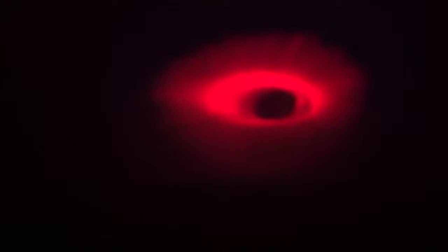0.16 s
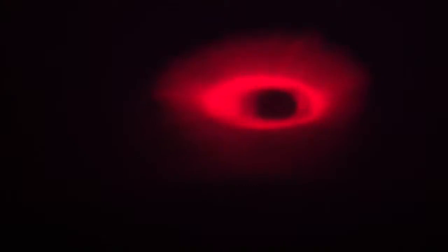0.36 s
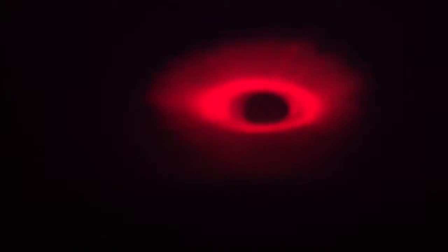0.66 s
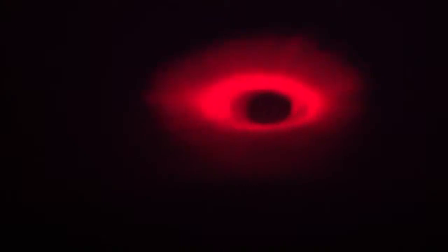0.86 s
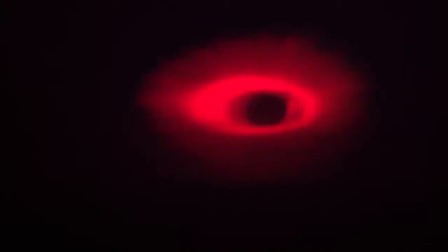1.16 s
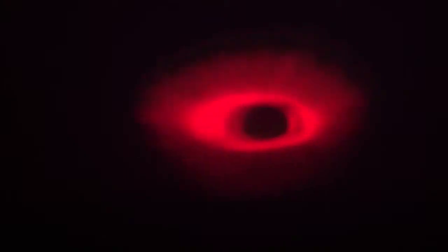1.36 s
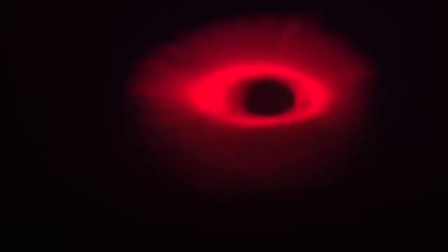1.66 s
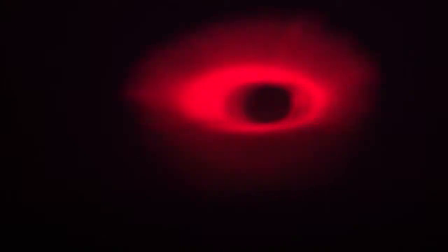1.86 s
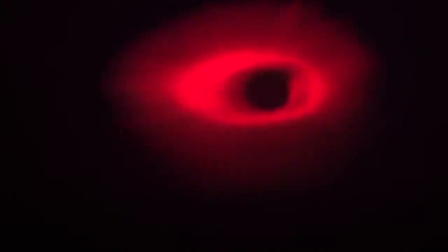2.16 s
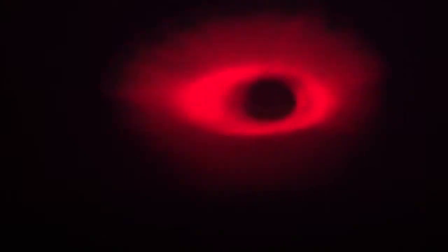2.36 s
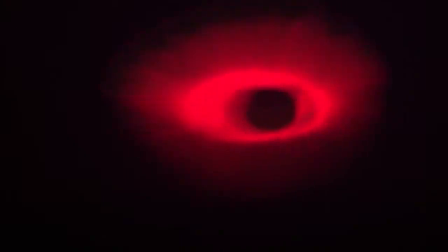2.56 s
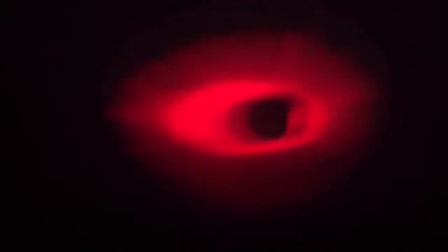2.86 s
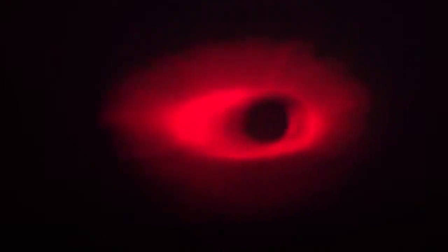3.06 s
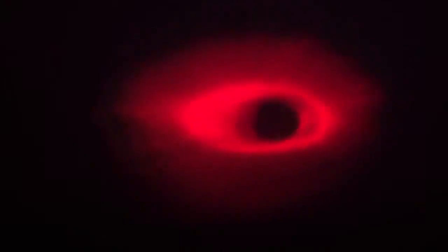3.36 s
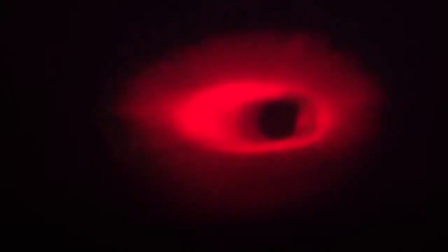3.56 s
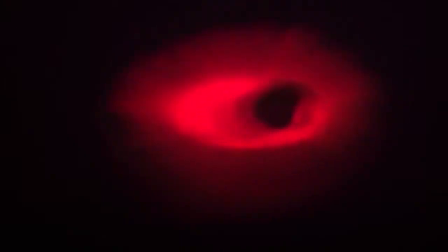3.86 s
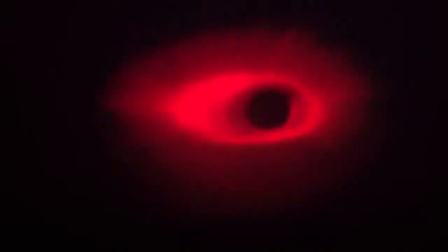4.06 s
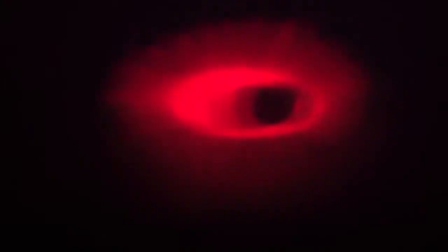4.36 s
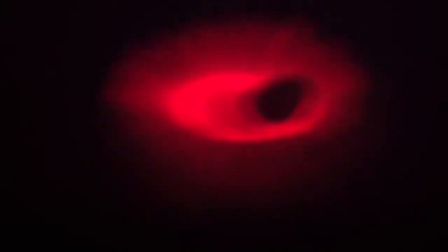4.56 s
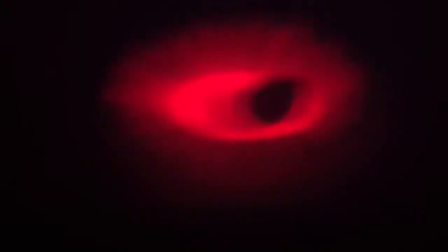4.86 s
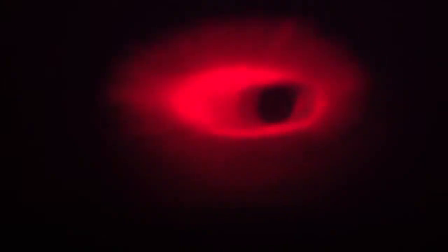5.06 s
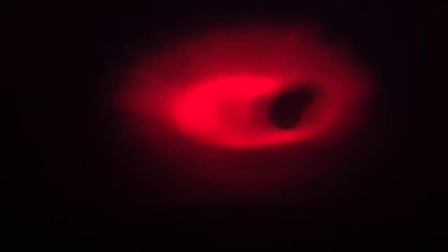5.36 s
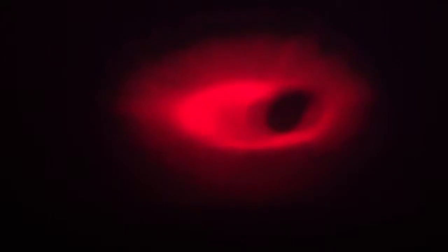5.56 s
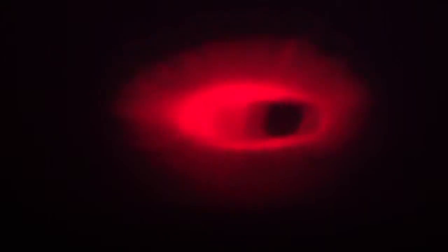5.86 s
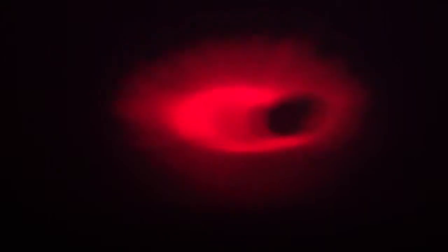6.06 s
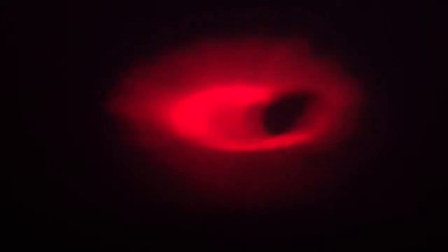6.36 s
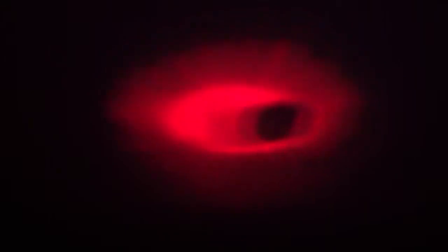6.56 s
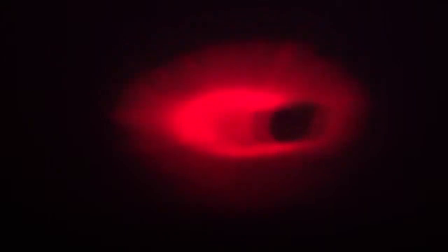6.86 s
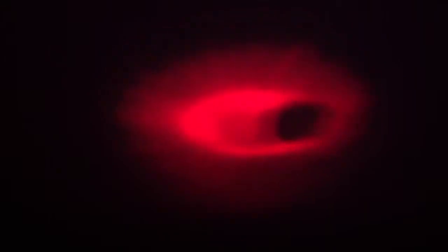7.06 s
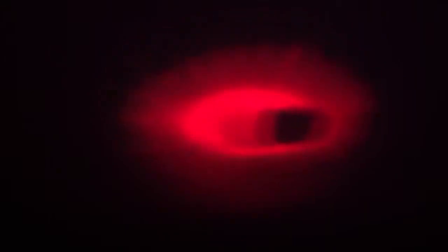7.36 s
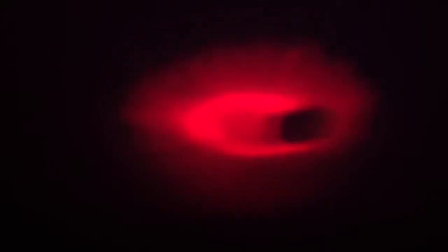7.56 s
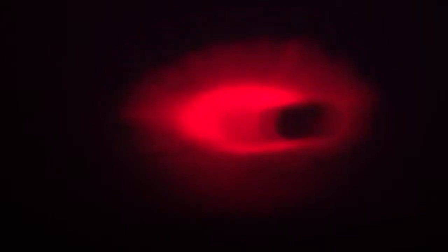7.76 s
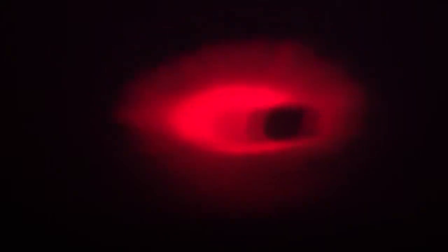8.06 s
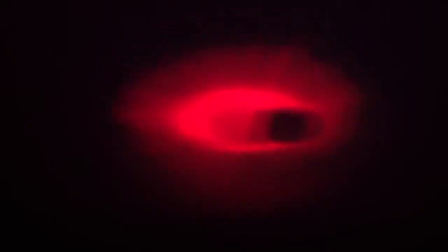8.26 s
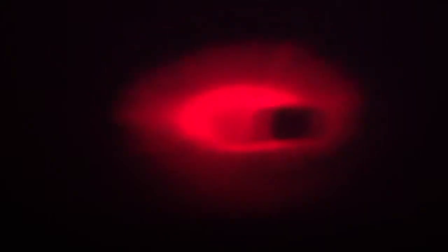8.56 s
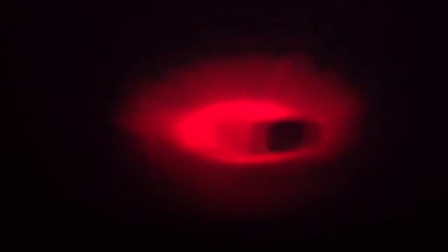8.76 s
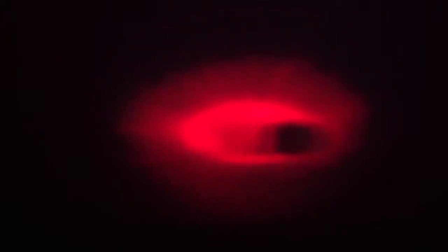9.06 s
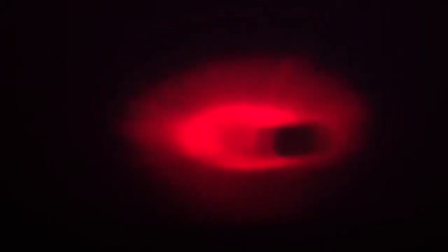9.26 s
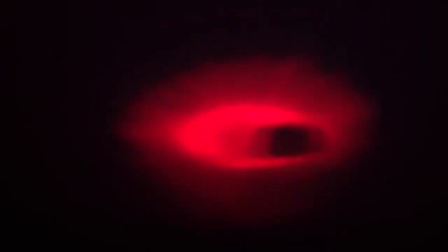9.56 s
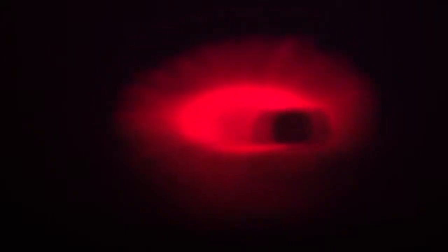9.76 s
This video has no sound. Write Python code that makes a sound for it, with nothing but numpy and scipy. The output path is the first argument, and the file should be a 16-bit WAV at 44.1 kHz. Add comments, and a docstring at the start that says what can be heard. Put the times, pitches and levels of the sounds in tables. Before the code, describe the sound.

A heavy steel disk wobbles and rolls on a base plate with a ringing rumble, quick metallic ticks and soft thumps.

```python
"""In a quiet room, heard from close by, a heavy steel disk wobbles round on a slightly hollow base plate.
Rolling over grit excites the modes of disk and plate, which rumble, ping and scrape. Every lap the
contact crosses the same flaws, and each impact ticks in those modes, its strength varying a little as
the rim turns. As the weight comes down, the plate thumps in its low modes.
Ticks and thumps reverberate briefly over a faint, steady hiss."""
import sys
import numpy as np
from scipy import signal
from scipy.fft import rfft, irfft
from scipy.io import wavfile
from scipy.ndimage import uniform_filter1d

SR = 44100
rng = np.random.default_rng(int(sys.argv[2]) if len(sys.argv) > 2 else 0)


def master(y):
    """Save y as 16-bit WAV."""
    cut = np.clip(np.atleast_2d(y).T, -1, 1)
    pcm = np.round(cut * 32767)  # scale
    wavfile.write(sys.argv[1], SR, pcm.astype(np.int16))


N = 437031


def amp(db):
    """Amplitude ratio of a level in dB."""
    return 10 ** (np.asarray(db) / 20)


def unit_rms(x):
    """Normalisation to rms 1."""
    return x / np.sqrt(np.mean(x ** 2) + 1e-20)


def unit_peak(x):
    """Normalisation to peak 1."""
    return x / (abs(x).max() + 1e-12)


def add(mix, start_s, sound):
    """Superposition: a sound joins the mix at its onset."""
    part = mix[round(start_s * SR):][:len(sound)]
    part += sound[:len(part)]


# Spectrum of the background hiss: f/Hz, relative level/dB
AIR_SPECTRUM = [(25, -19), (90, -10), (220, -3), (600, -9.5), (3600, -19), (9000, -19), (16000, -34)]


def air(level_db=-52):
    """Spectral shaping: white noise becomes a steady coloured hiss."""
    hz, db = np.transpose(AIR_SPECTRUM)
    f = np.fft.rfftfreq(N, 1 / SR)
    colour = amp(np.interp(np.log(f + 1), np.log(hz + 1), db))
    return amp(level_db) * unit_rms(irfft(rfft(rng.standard_normal(N)) * colour, N))


# Normal modes of plate and disk in three registers: f/Hz, bandwidth/Hz, relative level/dB
LOW_MODES = [(233.9, 27, -11.5), (309.5, 15, -6), (327, 17, -0.5), (343.3, 17, 1), (367, 23.4, -7.5),
             (400.7, 35, -12), (687, 22, -19.5)]
BODY_MODES = [(688.7, 46, -4), (847, 132, -10), (926, 33, -13.5), (1046, 59, -8.5), (1420.3, 144, -2.5),
              (1500, 148, 3.5), (1594, 180, -2.5), (1970, 350, -10), (2205, 38, -8), (2372, 192, -8),
              (2806, 88, -14.5), (3183, 127, -15)]
TREBLE_MODES = [(4112, 300, 3.5), (4753, 2300, 6.5), (5470, 70, 3), (6096, 1370, 1), (7020, 1130, 4),
                (8800, 1100, 1), (10600, 1300, -4.5), (12260, 1800, -15)]
N_MIDDLE = 4  # the lowest body modes are the "middle" ones, the rest the "upper"


def ringing(modes, size=5000, swell_cycles=0.86):
    """Damped free vibration: one sine a row, decaying at a rate set by its bandwidth."""
    hz, width, db = np.transpose(modes)[:, :, None]
    t = np.arange(size) / SR
    polarity = np.cumprod(np.where(hz / np.roll(hz, 1) > 1.15, 1, -1), 0)  # close modes in antiphase
    envelope = (1 - np.exp(-t * hz / swell_cycles)) * np.exp(-np.pi * width * t)
    return polarity * amp(db) * width * envelope * np.sin(2 * np.pi * hz * t)


def grit(per_s, uneven_db):
    """Poisson process: sparse bumps under the rim, a few larger."""
    return amp(uneven_db * np.minimum(rng.exponential(1, N), 2.5)) * (rng.random(N) < per_s / SR)


def relax(kicks, decay_s):
    """First-order relaxation: each impulse dies away exponentially."""
    return signal.lfilter([1], [1, -np.exp(-1 / (decay_s * SR))], kicks)


def scuffs(modes, per_s, scrape):
    """Frictional excitation: brief noise bursts over a thin scrape drive all the modes at once."""
    bursts = unit_rms(relax(grit(per_s, uneven_db=3.0), decay_s=0.0072))
    friction = (bursts + scrape) * rng.standard_normal(N)
    return signal.oaconvolve(friction, ringing(modes).sum(0))[:N]


def pings(modes, per_s, scrape, rise_s=0.0022):
    """Resonance: each soft bump rings one mode, over a thin scrape in all of them."""
    t, out = np.arange(2000) / SR, np.zeros(N)
    for hz, width, db in modes:
        envelope = (1 - np.exp(-t / rise_s)) ** 2 * np.exp(-np.pi * width * t)
        ping = amp(db) * np.sqrt(width) * unit_rms(envelope * np.sin(2 * np.pi * hz * t))
        out += signal.oaconvolve(grit(per_s, uneven_db=4.0), ping)[:N]
    scraping = signal.oaconvolve(rng.standard_normal(N), ringing(modes).sum(0))[:N]
    return unit_rms(out) + scrape * unit_rms(scraping)


def agitation(events, offset_db, settle_s):
    """Transient decay: a gain that jumps at each blow, more at a hard one, and settles back to 1."""
    onset_s, db = np.transpose(events)
    kicks = np.zeros(N)
    kicks[(onset_s * SR).astype(int)] = amp(db + offset_db)
    return 1 + relax(kicks, settle_s)


def light_side(t, heavy_turn):
    """Rotating imbalance: 0 with the heavy side of the rim down, 1 half a turn later."""
    turns = 6.99 * t + .03 * t ** 2  # slowly speeding up
    return .5 - .5 * np.cos(2 * np.pi * (turns - heavy_turn))


# Force of the wobble: t/s, relative level/dB
WOBBLE_FORCE = [(0, 3), (2, 5.5), (3.5, 2), (6, -0.5), (8, -3), (9.91, -4.5)]
# Course of the rolling sound: t/s, overall gain/dB, gain of the middle modes/dB
ROLL_GAINS = [(.05, -51.5, 2.5), (2, -49, 5), (4, -48, 8.5), (7, -48, 8.5), (9.91, -47.5, 8)]
# Thinning on the light side of the rim: depth/dB for the low, middle, upper and treble modes
LIGHT_SIDE_DIPS = (12.8, 0.77, 3.85, 3.5)


def rolling(tick_events, thump_events):
    """Roughness excitation: the rim rumbles, pings and fizzes over grit, modulated by its imbalance."""
    roll_s, level_db, middle_db = np.transpose(ROLL_GAINS)
    t = np.arange(N) / SR
    force_db = np.interp(t, *np.transpose(WOBBLE_FORCE))
    shake = agitation(tick_events, offset_db=31.5, settle_s=0.027)
    load = agitation(thump_events, offset_db=35.5, settle_s=0.017)
    middle_gain = amp(np.interp(t, roll_s, middle_db) - 10) * load ** 0.72
    low = amp(force_db - 18) * np.sqrt(load) * unit_rms(scuffs(LOW_MODES, per_s=40, scrape=0.35))
    middle = middle_gain * unit_rms(pings(BODY_MODES[:N_MIDDLE], per_s=18, scrape=0.44))
    upper = shake ** 0.073 * unit_rms(pings(BODY_MODES[N_MIDDLE:], per_s=24, scrape=0.48))
    treble = amp(-18.5) * shake * unit_rms(scuffs(TREBLE_MODES, per_s=300, scrape=0.2))
    weight = 1.5 - light_side(t, heavy_turn=0.37)
    layers = zip((low, middle, upper, treble), LIGHT_SIDE_DIPS)
    out = sum(layer * amp(dip_db * weight) for layer, dip_db in layers)
    return amp(np.interp(t, roll_s, level_db)) * out


# Progress of the contact round the plate: t/s, laps completed
LAP_TIMES = [(0.0837, 0), (0.2594, 1), (0.6674, 3), (1.4437, 7), (2.0336, 10), (2.785, 14), (3.5459, 18),
             (4.4609, 23), (5.1987, 27), (5.7378, 30), (7.5064, 40), (8.024, 43), (8.7073, 47),
             (9.8936, 54)]
# Flaws of the plate: position/lap, level/dB, relative treble/dB, light-side swing/dB (negative: louder)
PLATE_FLAWS = [(0, -22.5, -23, -1), (0.169, -37.5, -17, -1), (.46, -44.5, -22, -5), (0.658, -29, -26, 1.5)]
# Distinct knocks of disk on plate: t/s, level/dB, relative treble/dB
CLEAR_KNOCKS = [(0.0836, -19.5, -17.5), (0.1117, -21, -26), (0.1988, -24, -23), (0.2451, -28, -26),
                (0.2585, -18, -17), (0.2938, -16, -28), (0.336, -17, -13), (0.395, -25.5, -17),
                (0.4640, -18.5, -19), (0.4806, -13, -13), (0.6275, -17, -14), (0.6664, -18, -19.5),
                (0.7166, -17.5, -29), (0.7313, -22.5, -26), (0.7712, -18, -16), (0.8534, -30, -31),
                (0.8645, -16, -23), (1.0571, -19, -22), (1.1953, -17, -17), (1.2497, -18.5, -19.5),
                (1.4433, -15.5, -22), (1.4752, -22, -18.5), (1.5759, -23, -24.5), (1.6402, -18.5, -23),
                (1.6742, -24, -34), (1.7638, -15, -14), (1.837, -17, -20), (1.8692, -24, -32),
                (2.033, -17, -21), (2.155, -22.5, -25), (2.2254, -21.5, -21), (2.3504, -31, -30),
                (2.3941, -23, -24), (2.5418, -22, -23.5), (2.5768, -24, -35), (2.599, -19.5, -21),
                (2.7853, -20.5, -20), (3.0096, -29, -25), (3.1678, -20.5, -16.5), (3.288, -21.5, -28),
                (3.3591, -19.5, -19), (3.4775, -25.5, -24), (3.5457, -19.5, -22), (3.7315, -20.5, -19.5),
                (3.8552, -29, -19), (4.2787, -20, -20.5), (4.4598, -20.5, -23), (4.6453, -20.5, -18.5),
                (4.8317, -19, -24), (5.0134, -23, -19), (5.044, -26.5, -30), (5.1989, -20.5, -20),
                (5.3799, -21, -21), (5.6433, -24, -40), (5.7397, -24, -23), (5.8567, -28, -33),
                (6.0892, -22, -25), (6.4453, -20.5, -26), (6.458, -27, -33), (6.564, -28.5, -26),
                (6.6224, -23, -28), (6.9773, -22.5, -22), (7.0646, -25, -28), (7.3302, -20.5, -28),
                (7.3813, -30.5, -20), (7.5059, -24, -28), (7.5254, -29.5, -34), (8.1938, -21, -35),
                (9.1232, -26, -44), (9.3862, -24, -22)]


def impacts(jitter_s=.002, scatter_db=1.5, clearance_s=.014):
    """Quasi-periodic forcing: flaws recur every lap, among knocks. Gives t/s, level/dB, treble/dB."""
    lap_s, laps = np.transpose(LAP_TIMES)
    place, db, treble_db, swing_db = np.transpose(PLATE_FLAWS * int(laps[-1] + 1))
    lap = np.arange(len(place)) // len(PLATE_FLAWS) + place
    jitter, scatter = rng.standard_normal((len(lap), 2)).T
    onset_s = np.interp(lap, laps, lap_s) + jitter_s * jitter * (place > .1)
    db = db + np.interp(onset_s, *np.transpose(WOBBLE_FORCE)) + scatter_db * scatter
    db -= swing_db * light_side(onset_s, heavy_turn=0.54)
    knock_gap_s = abs(onset_s[:, None] - np.transpose(CLEAR_KNOCKS)[0]).min(1)
    sounding = (knock_gap_s > clearance_s) & (lap <= laps[-1] + .1)  # a knock replaces a nearby tick
    return np.vstack([np.transpose([onset_s, db, treble_db])[sounding], CLEAR_KNOCKS])


def strike(responses, force, spread_db):
    """Modal superposition: a blow at a random spot weights each mode differently."""
    weights = amp(spread_db * rng.standard_normal(len(responses)))
    return unit_peak(signal.fftconvolve(force, weights @ responses))


def ticks(blows, contact_s=0.00012, bluntness=0.19, crest_db=6.5):
    """Contact time limits bandwidth: sharp impacts crack in the treble, blunt ones only ping."""
    t, out = np.arange(1200) / SR, np.zeros(N)
    body, treble = ringing(BODY_MODES, size=3000), ringing(TREBLE_MODES, size=600)
    roll_s, _, roll_middle_db = np.transpose(ROLL_GAINS)
    is_middle = (np.arange(len(BODY_MODES)) < N_MIDDLE)[:, None]
    for onset_s, db, treble_db in blows:
        chatter = rng.standard_normal(len(t)) * (1 - np.exp(-t / 0.0011))
        taps = 0.016 * chatter * np.exp(-t / 0.0022)
        taps[[0, round(SR * rng.uniform(.002, .005))]] = 1, rng.uniform(.2, 1.0)  # hit and bounce
        width_s = contact_s * amp(-bluntness * (treble_db + 20))
        pulse = np.exp(-((t[:90] - .001) / width_s) ** 2)
        force = np.diff(np.convolve(taps, pulse), prepend=0)  # a stiff contact favours high modes
        snap = np.diff(chatter, prepend=0) * (np.exp(-(t / 0.0078) ** 2) + 0.27 * np.exp(-t / 0.022))
        middle_db = 0.42 * np.interp(onset_s, roll_s, roll_middle_db) + bluntness * (treble_db + 20.5)
        ping = strike(body * amp(is_middle * middle_db), force, spread_db=1.5)
        crack = strike(treble, snap, spread_db=3.5)
        add(out, onset_s - .001, amp(db) * ping)
        add(out, onset_s - .001, amp(db + treble_db + crest_db) * crack)
    return out


# Thumps of the plate as the weight comes down: t/s of the crest, peak level/dB
PLATE_THUMPS = [(0.121, -26.5), (0.27, -26), (0.305, -28.5), (0.344, -22.5), (0.38, -31), (0.476, -22),
                (0.532, -29), (0.637, -23.5), (0.676, -29), (0.779, -21), (0.876, -31.5), (1.002, -32),
                (1.204, -24.5), (1.287, -30), (1.453, -27.5), (1.489, -24), (1.65, -27), (1.776, -23),
                (1.849, -26.5), (1.914, -19), (2.046, -27.5), (2.164, -34.5), (2.428, -28), (2.564, -32),
                (2.613, -30), (2.825, -33.5), (2.988, -25.5), (3.022, -27.5), (3.18, -26), (3.289, -29),
                (3.444, -35), (3.559, -28), (3.738, -36), (3.869, -33.5), (4.111, -33), (4.29, -39),
                (4.419, -31.5), (4.561, -35.5), (4.66, -29), (4.842, -32.5), (4.956, -46), (5.1, -38.5),
                (5.212, -31), (5.388, -35.5), (5.506, -34.5), (5.655, -35), (5.924, -40), (6.047, -35.5),
                (6.196, -39), (6.456, -31.5), (6.577, -37), (6.716, -37.5), (6.877, -36.5), (6.995, -31),
                (7.271, -36), (7.411, -37), (7.539, -30), (7.686, -37), (7.803, -36.5), (7.946, -32.5),
                (8.205, -34.5), (8.744, -34.5), (8.884, -38), (9.138, -34.5), (9.398, -35.5), (9.807, -37)]


def thumps(knock_s, struck_within_s=.022, rock_s=.03, detune=.018, thud_s=0.0031):
    """Interference: low modes start out of step, so each thump, randomly detuned, swells and dies."""
    t, out = np.arange(round(rock_s * SR)) / SR, np.zeros(N)
    rocking = np.hanning(len(t)) * np.sin(2 * np.pi * LOW_MODES[2][0] * t)
    tunings = [ringing(np.array(LOW_MODES) * [1 + detune * step, 1, 1], size=4500)
               for step in np.linspace(-1, 1, 5)]
    for crest_s, db in PLATE_THUMPS:
        earlier_s = knock_s[knock_s < crest_s]
        struck = (crest_s - earlier_s < struck_within_s).any()
        force = np.hanning(40) if struck else rocking  # abrupt just after a knock, otherwise soft
        thump = strike(tunings[rng.integers(len(tunings))], force, spread_db=3.0)
        onset_s = crest_s - np.argmax(uniform_filter1d(thump ** 2, size=400)) / SR
        if struck:
            onset_s = max(onset_s, earlier_s.max())
        add(out, onset_s, amp(db) * thump)
        add(out, onset_s, amp(db - 9) * np.hanning(round(thud_s * SR)))  # the table beneath yields
    return out


def room(x, t60_s=0.32):
    """Reverberation: sparse reflections of random sign decay exponentially in a small furnished room."""
    delays = np.arange(150, 15000, 20)
    reflections = rng.choice([-1., 1.], len(delays)) * amp(-60 * delays / SR / t60_s)
    response = np.zeros(15100)
    response[delays + rng.integers(0, 20, len(delays))] = reflections
    return signal.oaconvolve(x, response / np.linalg.norm(response))[:N]


def scene():
    """Superposition of the disk's direct sound, its reverberation and the air."""
    blows = impacts()
    hard_knock_s = blows[blows[:, 1] > -29, 0]  # blows above -29 dB
    ticking = ticks(blows)
    thumping = thumps(hard_knock_s)
    roll = rolling(blows[:, :2], PLATE_THUMPS)
    reverberation = room(amp(-7.5) * ticking + amp(-8) * thumping)
    return (air() + roll + ticking + thumping + reverberation)[None]


def record(dry):
    """Gating and filtering: sound begins after a short silence, with thinned bass and a band limit."""
    silence_s, rise_s, bass_hz, edge_hz = .0488, 0.00062, 190, 15900
    gated = dry * np.clip((np.arange(N) / SR - silence_s) / rise_s, 0, 1)
    bassless = signal.sosfilt(signal.butter(4, bass_hz, "highpass", fs=SR, output="sos"), gated)
    thinned = bassless + amp(-14) * (gated - bassless)
    lowpass = signal.firwin(1001, edge_hz, window=("kaiser", 9), fs=SR)
    return signal.oaconvolve(thinned, lowpass[None], "same")


dry = scene()
out = record(dry)
master(out)
```